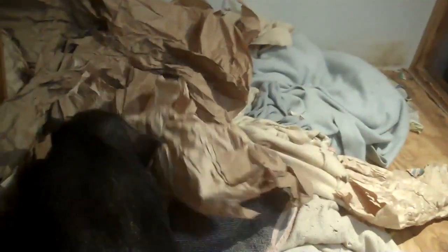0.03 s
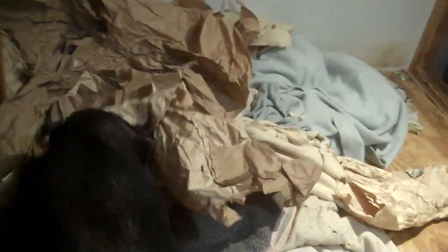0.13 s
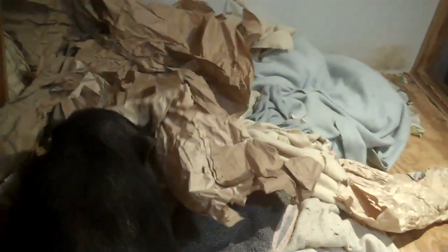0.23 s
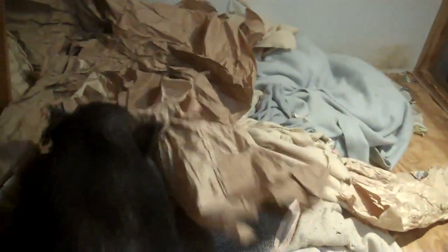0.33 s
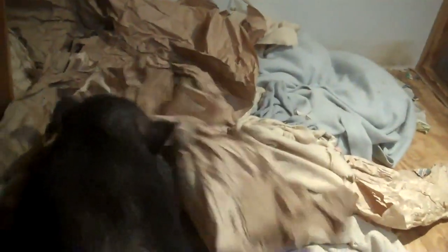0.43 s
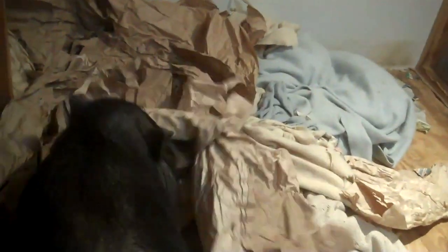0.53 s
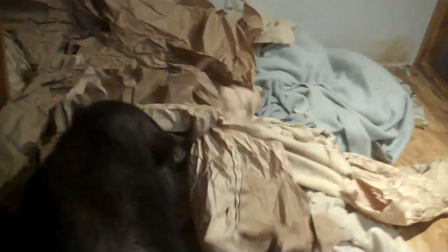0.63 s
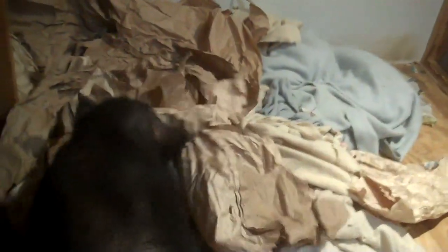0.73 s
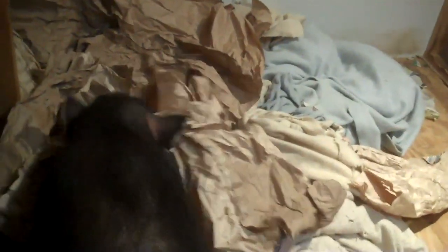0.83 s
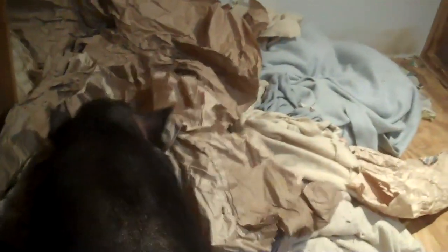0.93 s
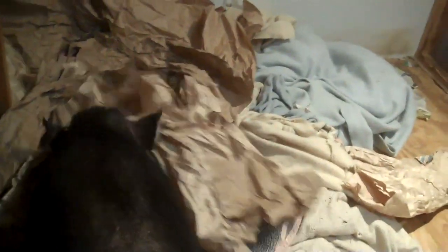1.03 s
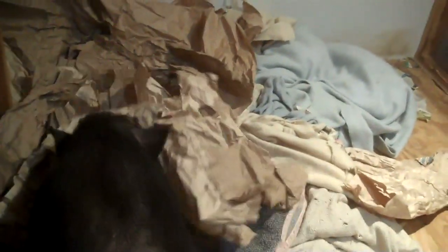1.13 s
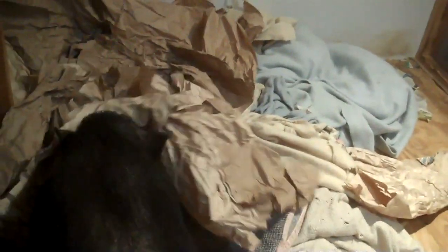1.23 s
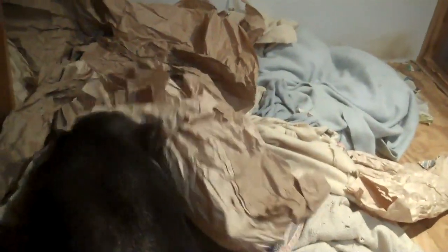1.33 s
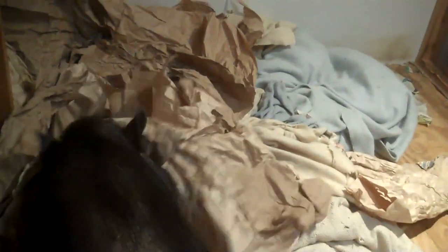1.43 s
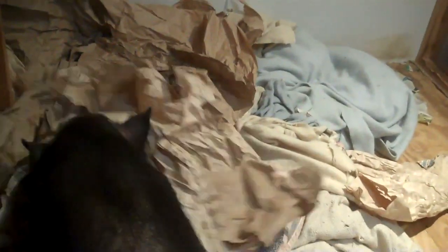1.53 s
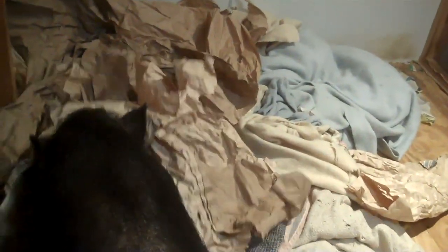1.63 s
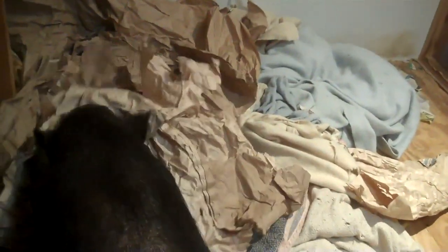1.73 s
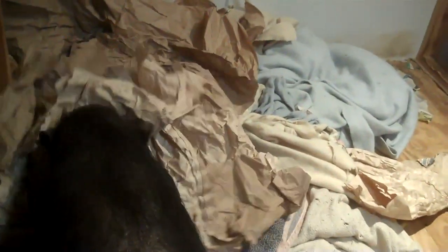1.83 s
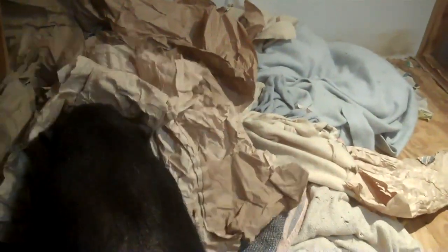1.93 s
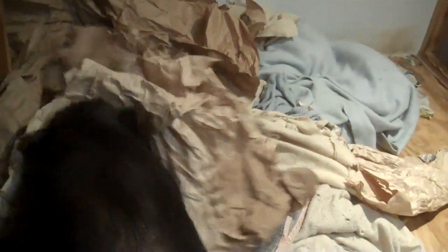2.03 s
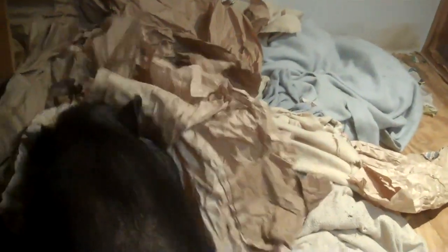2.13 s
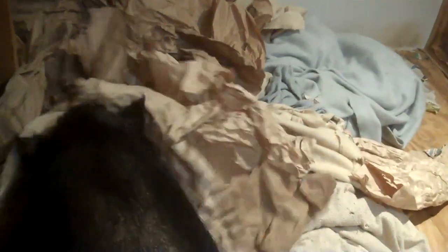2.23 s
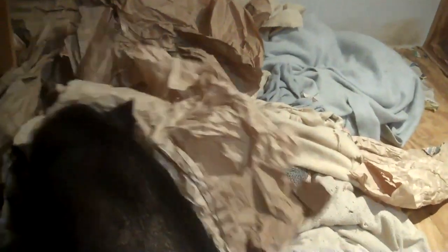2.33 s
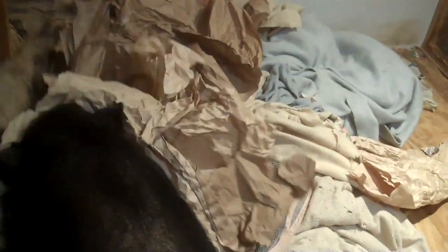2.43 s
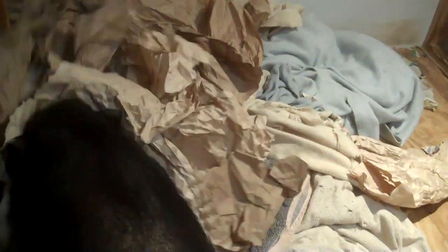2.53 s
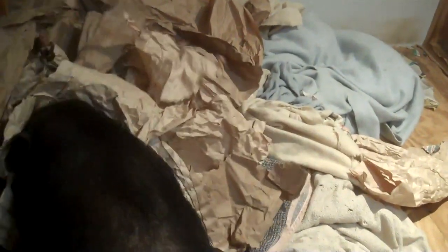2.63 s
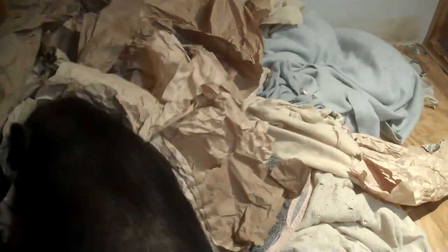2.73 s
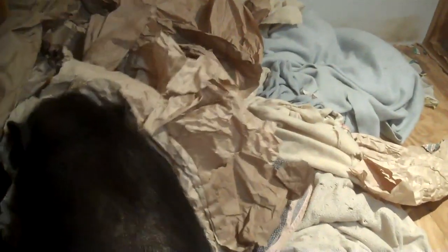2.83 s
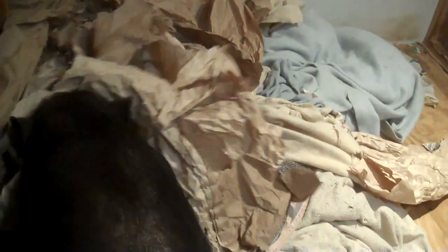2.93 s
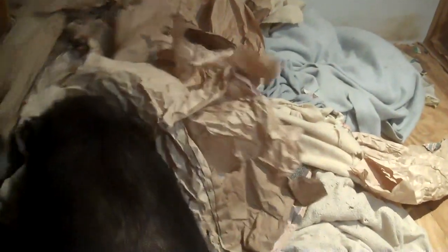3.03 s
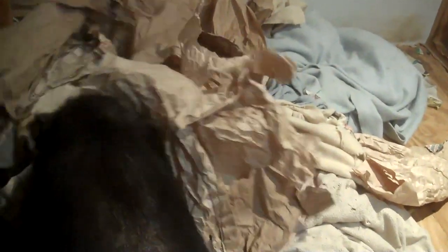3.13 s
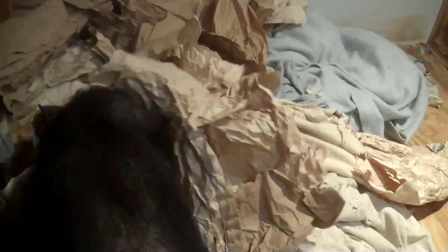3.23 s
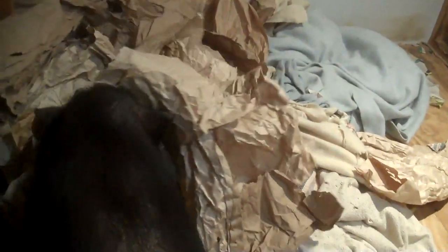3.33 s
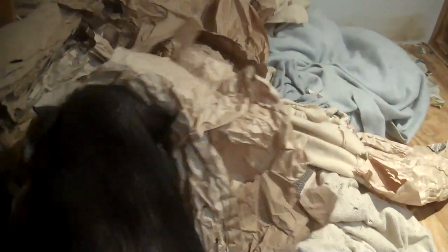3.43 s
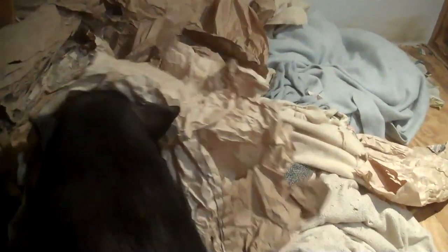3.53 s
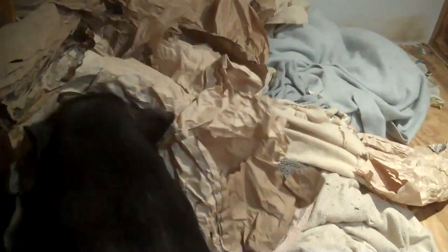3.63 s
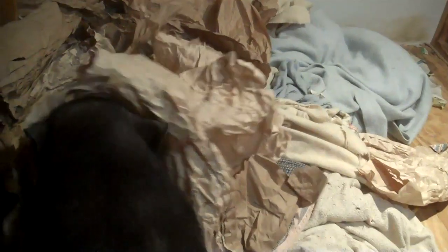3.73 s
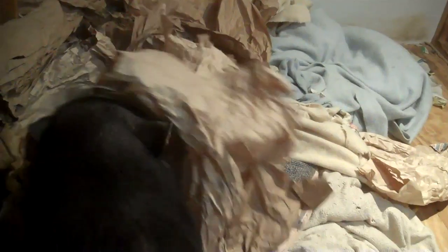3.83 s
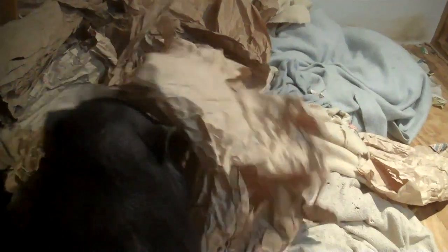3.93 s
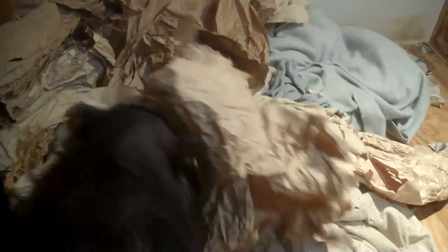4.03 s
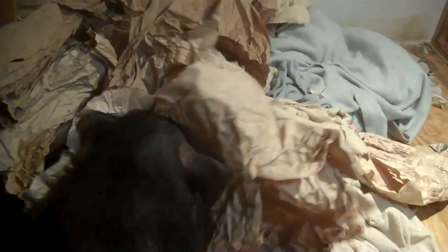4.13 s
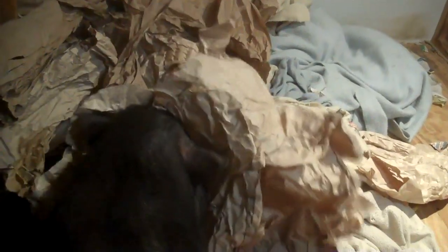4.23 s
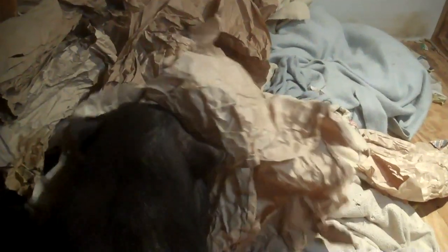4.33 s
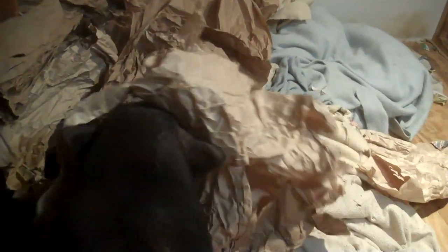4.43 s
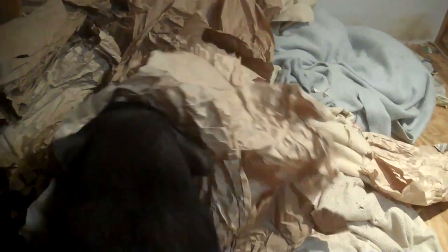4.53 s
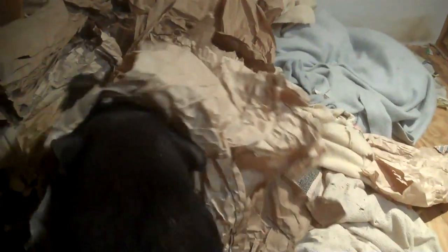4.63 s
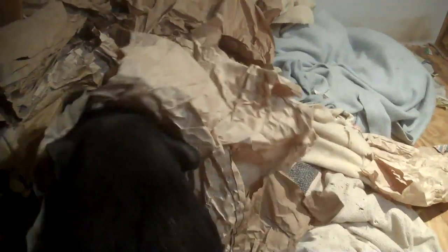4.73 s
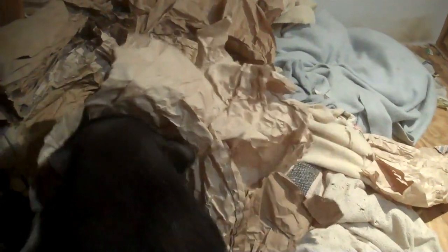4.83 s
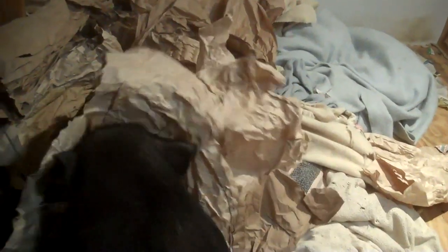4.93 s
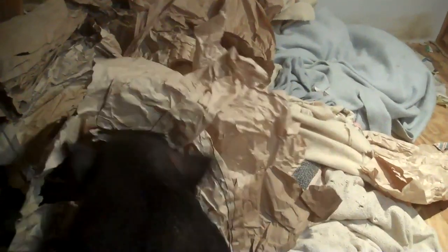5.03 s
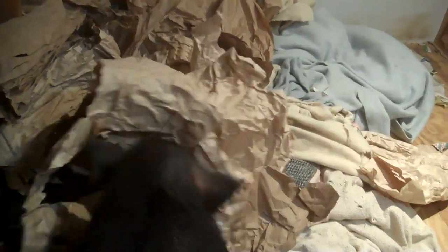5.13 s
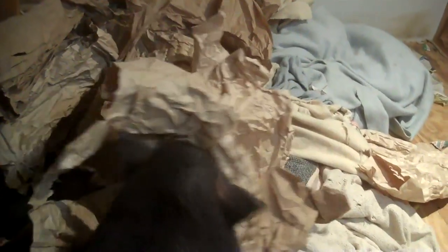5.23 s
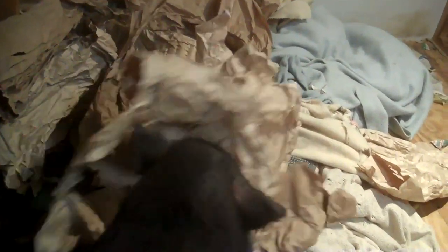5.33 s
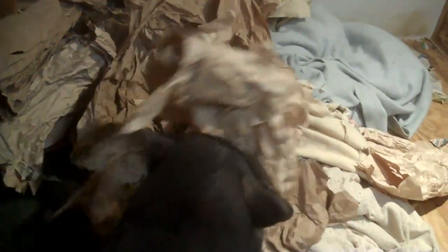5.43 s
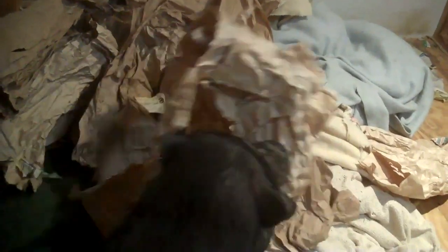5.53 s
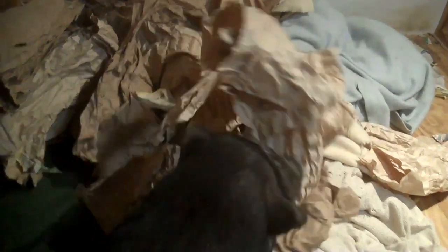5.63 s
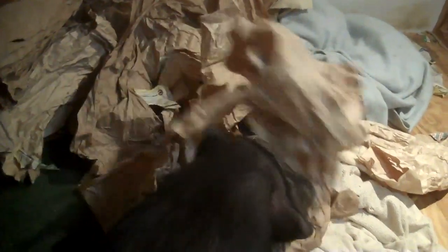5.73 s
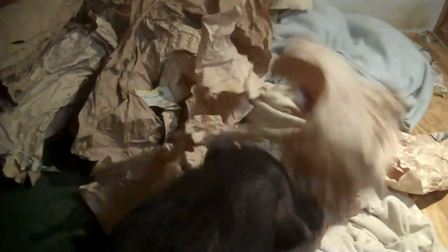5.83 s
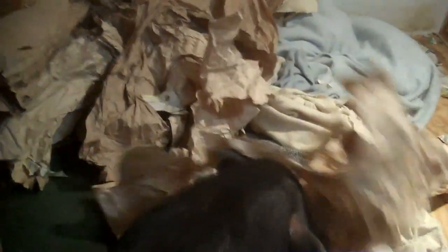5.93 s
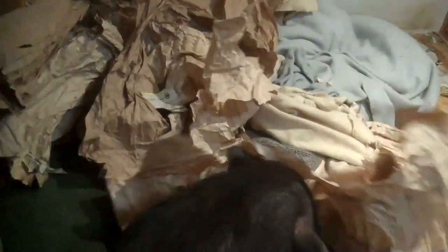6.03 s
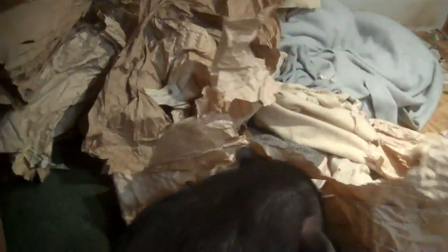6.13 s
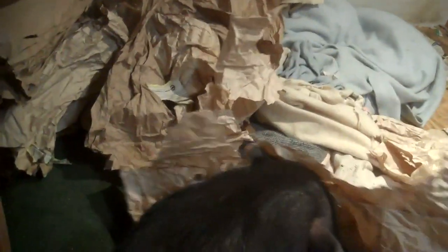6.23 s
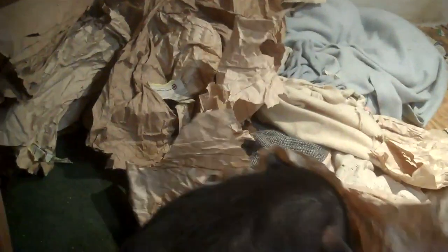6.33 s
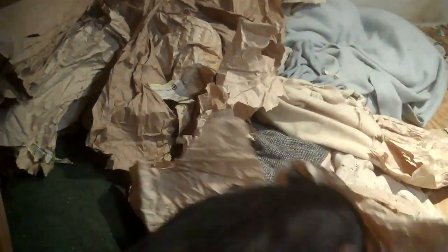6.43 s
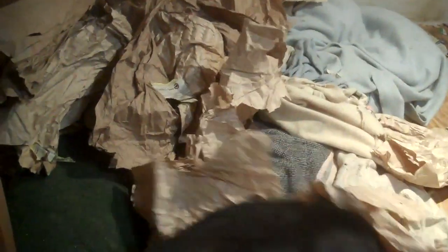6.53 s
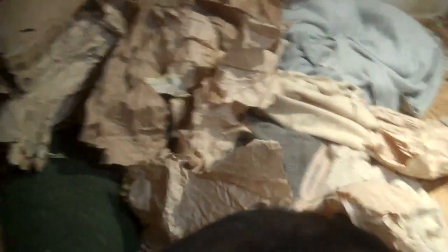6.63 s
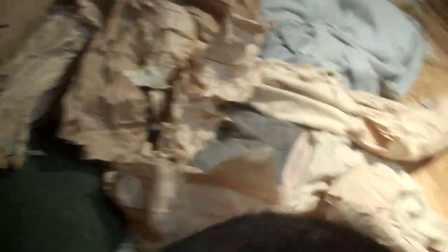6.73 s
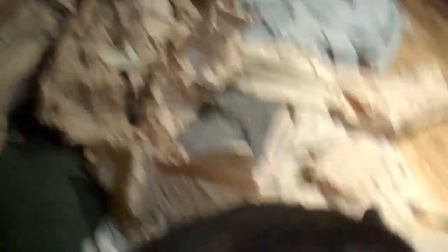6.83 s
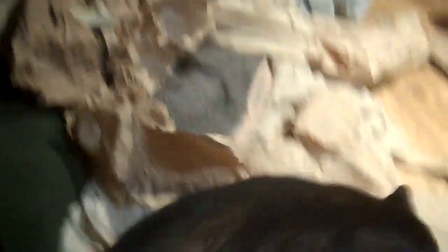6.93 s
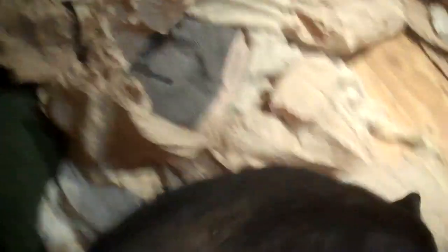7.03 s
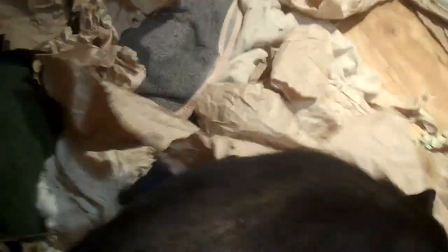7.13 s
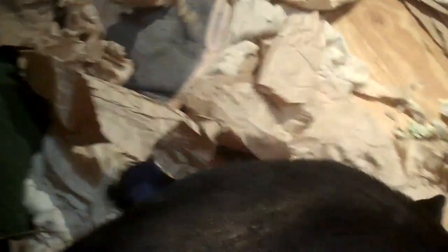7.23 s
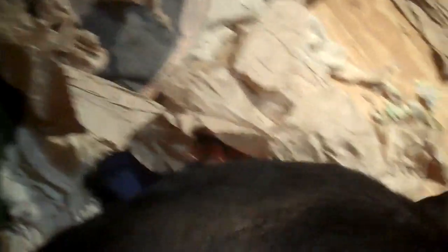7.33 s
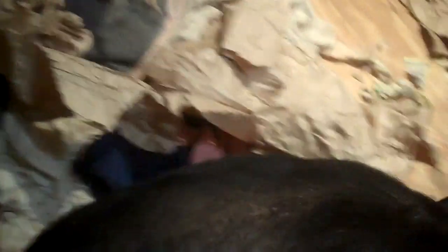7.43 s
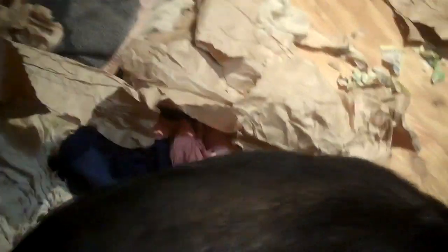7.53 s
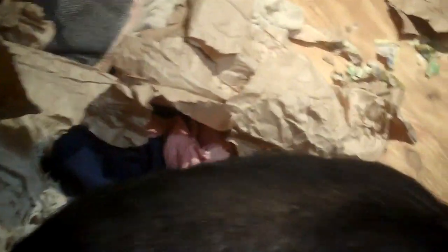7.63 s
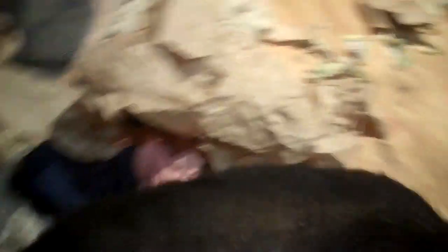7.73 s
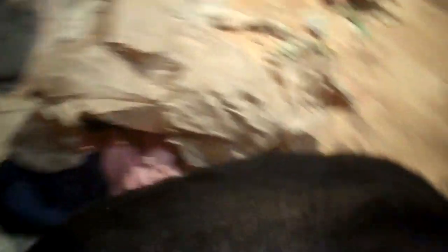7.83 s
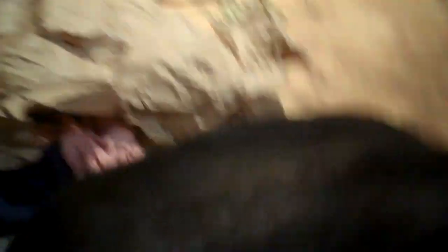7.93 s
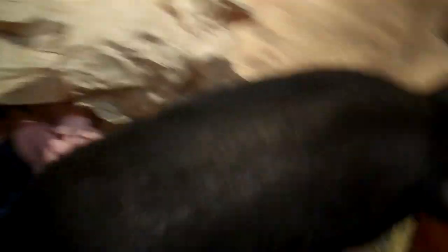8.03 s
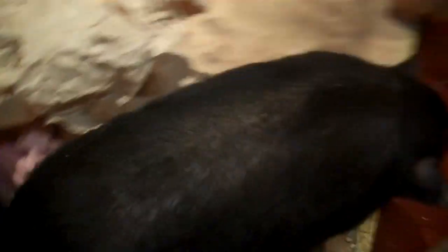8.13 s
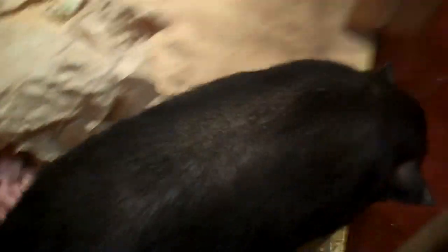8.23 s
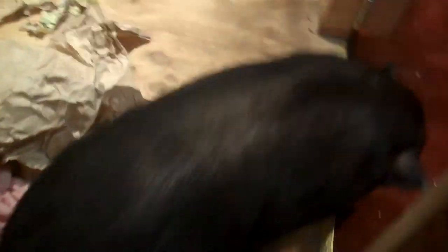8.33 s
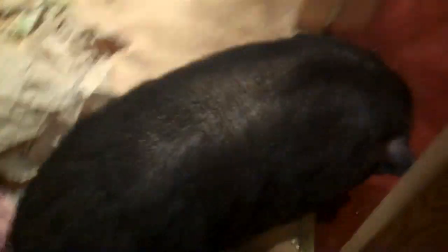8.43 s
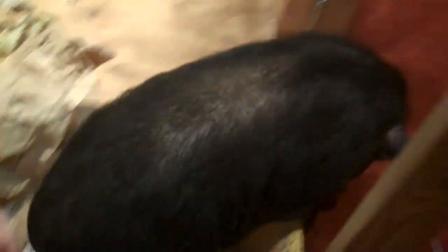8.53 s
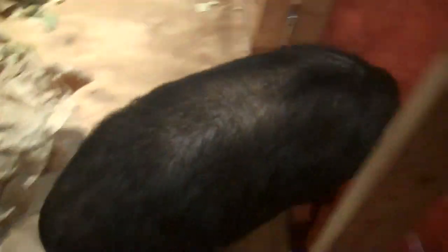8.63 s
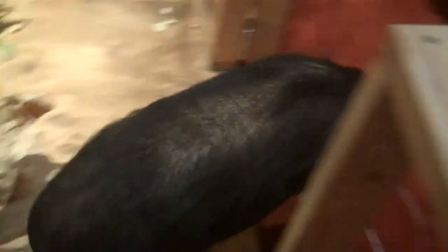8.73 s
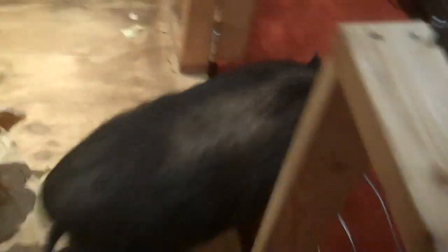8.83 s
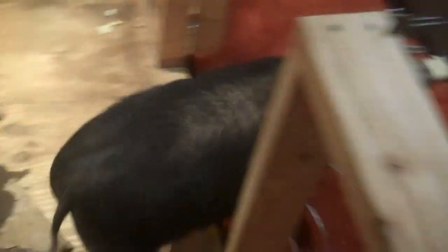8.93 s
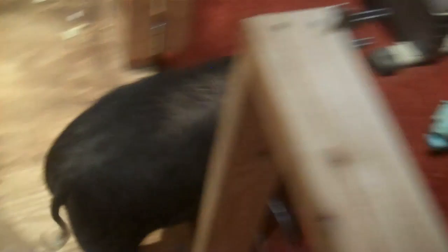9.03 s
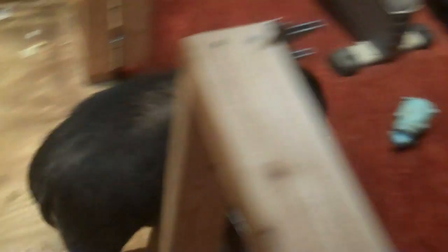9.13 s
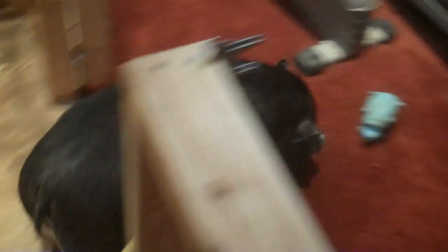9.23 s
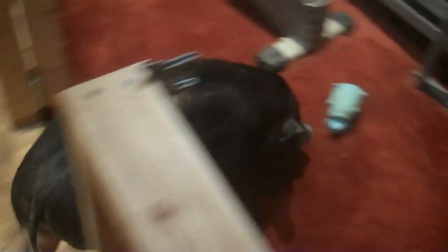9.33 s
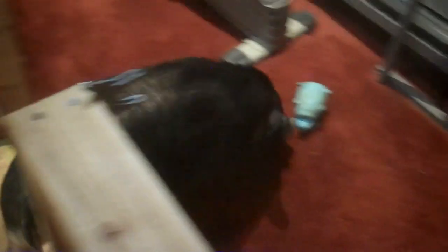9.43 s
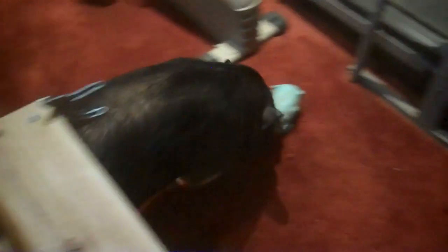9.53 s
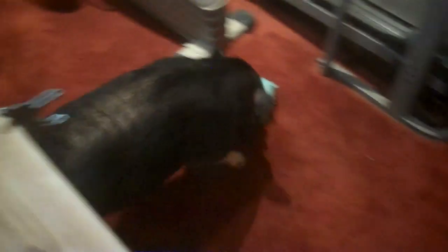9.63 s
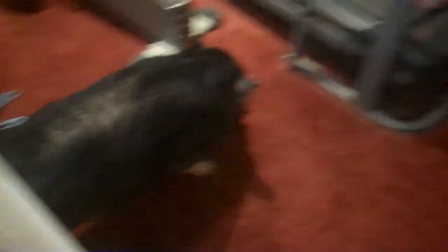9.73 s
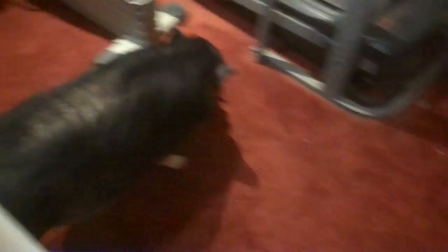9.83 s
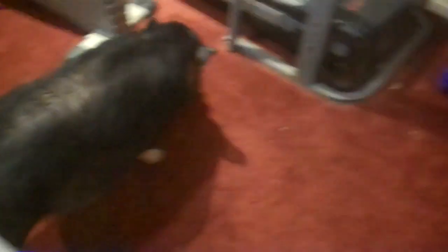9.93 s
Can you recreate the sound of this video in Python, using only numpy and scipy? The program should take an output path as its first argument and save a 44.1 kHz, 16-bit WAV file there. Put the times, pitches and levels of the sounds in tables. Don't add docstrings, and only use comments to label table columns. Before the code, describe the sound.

From the start, stiff packing paper crackles densely and very close as a pig shoves its snout through the heap. Until about 3.4 seconds the shoves overlap, loud and bright, with sharp snaps, crinkles, hollow panel pops and soft body rumble. From 3.5 to 7.1 seconds the nudges are lighter and more uneven, with snaps clustering near 4.1 and single cracks around 5.3, 6.2 and 6.6. At 7.4 a hoof clacks hard on a loose board, another follows at 7.8, and scraps tick and rustle between. A skid sounds near 8.4, a paper snap at 8.6 and a clack at 8.75; around 9.0 to 9.2 a wooden frame rattles with final hard clacks. Faint, dull carpet steps and tiny rustles fade until nearly 10 seconds. The small room gives short reflections; light hiss, a very faint high whine and handling rumble remain beneath.

```python
import sys
import numpy as np
from scipy import signal
from scipy.io import wavfile

SR = 44100
rng = np.random.default_rng(int(sys.argv[2]) if len(sys.argv) > 2 else 0)


def generate_wav(sig):
    pcm = np.round(np.clip(np.atleast_2d(sig).T, -1, 1) * 32767).astype(np.int16)
    wavfile.write(sys.argv[1], SR, pcm)


def gain_from_db(level_db):
    decades = np.asarray(level_db, float) / 20
    return 10 ** decades


N = 440118

# weight, rumble, rustle, crackle [Hz]
PUSH_HZ = [130, 480, 1900, 5500]
# (frequency [Hz], density [dB per Hz])
PAPER = [(40, -44), (90, -48), (170, -5), (380, 5), (640, 0.5), (900, 9), (2000, 7), (3500, 5.5), (7000, 1),
         (10000, -1), (14000, 5)]
# (middle [s], length [s], crackle [dB], heft [dB])
DIGS = [(0.149, 0.31, -20, -10.5), (0.267, 0.16, -24.5, -4.5), (0.441, 0.27, -23, -8.5),
        (0.545, 0.12, -25, -29), (0.661, 0.22, -22.0, -8), (0.836, 0.19, -24.5, -8.5),
        (0.915, 0.11, -23.5, -10), (0.977, 0.16, -27.5, -6), (1.219, 0.4, -22, -8),
        (1.303, 0.089, -17, -17), (1.464, 0.14, -26, -15), (1.629, 0.45, -25.5, -7.5),
        (1.859, 0.4, -21, -6.5), (1.981, 0.19, -24.5, -8.5), (2.131, 0.13, -23.5, -11.5),
        (2.219, 0.2, -28.5, -6), (2.347, 0.29, -23, -28), (2.396, 0.17, -23.5, -5.5),
        (2.611, 0.45, -24.5, -4), (2.619, 0.31, -22.5, -23), (2.861, 0.27, -30, -9), (3.054, 0.26, -26, -7),
        (3.245, 0.38, -29, -7.5), (3.411, 0.16, -33, -12.5)]
# (middle [s], length [s], crackle [dB], heft [dB])
NUDGES = [(1.345, 0.053, -29, -22), (3.564, 0.19, -30.5, -13), (3.734, 0.54, -32, -9.5),
          (3.836, 0.17, -33, -26), (4.093, 0.42, -28, -14.5), (4.358, 0.16, -31.5, -21),
          (4.473, 0.081, -36.5, -6), (4.626, 0.37, -28.5, -20), (4.95, 0.67, -33, -13),
          (5.021, 0.12, -28.5, -20), (5.314, 0.31, -34.5, -10.5), (5.516, 0.33, -35, -8),
          (5.745, .085, -38, -5.5), (5.977, 0.74, -31, -11.5), (6.032, 0.17, -28, -13),
          (6.1, .129, -35.3, -25), (6.273, 0.15, -28, -10.5), (6.468, .074, -32.5, -18),
          (6.55, .988, -33, -12.5), (6.656, 0.18, -31, -13), (6.84, 0.28, -28, -12.5),
          (7.02, 0.1, -30, -11.5), (7.11, 0.2, -29, -16)]
# (middle [s], length [s], crackle [dB], heft [dB])
SCUFFS = [(7.39, 0.32, -38.5, -12.5), (7.62, 0.6, -46, -8), (7.86, 0.057, -43, -9), (7.96, 0.56, -49, -5.5),
          (7.235, 0.11, -41, -10.5), (8.205, 0.1, -29.5, -13.5), (8.31, 0.29, -42, -11),
          (8.645, 0.13, -35, -9), (8.57, 0.091, -40, -15), (8.9, 0.94, -56.5, -0.5), (9.0, 0.047, -56, 1),
          (9.1, .07, -58, 13), (9.3, 0.14, -41.5, -10.5), (9.42, 0.18, -54.5, 2), (9.51, 0.049, -46, -25),
          (9.62, 0.22, -61, 4.5), (9.77, 0.26, -57, -1.5)]
# (start [s], length [s], crackle [dB], heft [dB])
JOLTS = [(.048, 0.054, -24.5, -13), (7.275, 0.07, -35.5, -4.5), (7.775, .12, -52, 0),
         (8.018, 0.038, -40, -15), (8.152, 0.061, -38.5, -8), (8.372, 0.18, -39, -7),
         (8.497, 0.043, -34.5, -15), (8.603, 0.05, -31.5, -25), (8.753, 0.066, -44, 4.5),
         (9.028, 0.062, -44, 1), (9.14, 0.042, -38.5, -1.5), (9.185, 0.062, -34, -1)]
# (middle [s], length [s], level [dB])
THUMPS = [(0.846, 0.13, -64), (1.827, 0.23, -39), (2.85, 0.16, -56), (4.25, 0.09, -55), (5.18, 0.18, -53),
          (6.753, 0.26, -42), (7.454, 0.064, -50), (7.79, .08, -50), (8.4, 0.074, -45), (8.598, 0.1, -38),
          (8.65, 0.055, -37), (8.836, 0.13, -54.5), (9.01, 0.16, -50), (9.712, 0.091, -49),
          (9.827, 0.051, -46)]
# (time [s], peak [dB], facet [Hz], bright click [dB])
SNAPS = [(0.244, 0.5, 2040, -7), (0.272, -4, 4530, -2), (0.309, -8, 2200, 0), (0.401, -4, 2210, -8),
         (0.612, 0, 1960, -16), (0.655, -6, 2070, -3), (0.796, -9, 1980, -21), (1.29, -8, 1910, -1.5),
         (1.392, -13, 4050, -5), (1.426, -7, 3450, -3), (1.488, -4.5, 3700, -5), (2.403, -16.5, 2740, 8.5),
         (2.985, -11, 4430, -15), (3.511, -15, 4000, -8), (4.095, -5.5, 3960, -7), (4.131, -5, 3060, -3),
         (4.152, -6.5, 4040, -3.5), (4.372, -17, 2060, -2), (4.57, -8, 1890, -21), (4.676, -14, 4320, -8),
         (4.98, -16, 4010, -3), (5.3, -11.5, 3700, -11), (5.372, -15, 3860, -20), (5.468, -12, 2540, -7),
         (5.958, -15.5, 4260, -3), (6.234, -6.5, 2500, 0), (6.635, -4.5, 2000, -10.5),
         (6.784, -13, 4300, -12), (6.898, -10, 3580, -15), (7.007, -9.5, 4460, -4), (8.625, -9, 2700, -22)]
# (time [s], peak [dB], facet [Hz], bright click [dB])
TICKS = [(0.0458, -3, 2360, -8), (0.3561, -5, 2220, -12), (0.4224, -8, 3110, -11), (1.1294, -20, 1960, -8),
         (1.5644, -16, 5000, -8), (1.6894, -15, 3200, -10), (1.8734, -2, 3490, -8), (1.8864, -5, 1860, -8),
         (2.0824, -19, 2340, -10), (2.1074, -15, 1520, -11), (2.2454, -14, 1850, -14),
         (2.287, -20, 4290, -8), (2.8634, -17, 1880, -11), (3.2034, -12, 3770, -8), (3.7978, -13, 3570, -8),
         (3.8294, -17, 4810, -8), (3.9834, -22, 2490, -10), (4.3191, -14, 3030, -10),
         (4.4774, -19, 2520, -8), (4.8559, -16, 2600, -11), (5.1804, -24, 2370, -8),
         (5.5782, -21, 3870, -8), (6.043, -12, 3350, -8), (6.2064, -19, 4430, -8), (6.3784, -21, 3710, -6),
         (6.4434, -21, 5000, -11), (6.5274, -21, 3040, -8), (6.621, -13, 2030, -1), (6.8544, -14, 4930, -1),
         (6.951, -17.5, 4840, -8), (7.0554, -19, 1520, -8), (7.3522, -21, 1360, -4),
         (7.3721, -19, 1920, -8), (7.4001, -25, 1990, -8), (7.7154, -28, 2010, -8), (8.1154, -36, 2130, -8),
         (8.5394, -39, 4850, -11), (8.5604, -27, 4680, -8), (8.588, -13, 4080, -5), (8.6, -14.5, 2640, -14),
         (8.659, -19, 2040, -7), (9.2814, -20, 3460, -11)]
# (time [s], peak [dB], facet [Hz])
CRINKLES = [(.094, -9, 1730), (0.137, -5.5, 2720), (0.209, -7.5, 2410), (.222, -8.5, 2380),
            (.235, -9, 2300), (0.686, -12, 2980), (0.974, -10, 1580), (1.072, -10.5, 770),
            (1.235, -8.5, 960), (1.605, -10, 2230), (1.856, -13, 2570), (2.495, -14, 3320),
            (2.719, -17, 1410), (3.728, -16, 1970), (3.76, -18, 3650), (4.189, -15.5, 2540),
            (4.268, -33, 400), (4.461, -21, 2770), (4.808, -21, 2630), (5.376, -21.5, 930),
            (5.405, -18.5, 920), (5.499, -20, 1640), (5.703, -20, 1480), (5.818, -16.5, 1450),
            (5.929, -29, 1810), (6.059, -22, 1410), (6.18, -19, 2160), (6.283, -10, 1750),
            (6.592, -16.5, 2630), (6.659, -18, 920), (6.735, -13, 2470), (6.976, -20, 1400),
            (0.018, -24, 1390), (0.121, -16, 1370), (0.302, -18, 1360), (0.397, -18, 797), (0.617, -21, 982),
        (0.795, -22, 1400), (0.972, -22, 1370), (1.072, -20, 775), (1.143, -19, 538), (1.234, -16, 926),
        (1.424, -30, 789), (1.462, -30, 1090), (1.546, -25, 1020), (1.697, -23, 950), (1.75, -12, 980),
        (2.087, -20, 945), (2.271, -26, 950), (2.313, -26, 972), (2.369, -16, 947), (2.445, -17, 794),
        (2.661, -16, 956), (2.719, -20, 1140), (3.137, -27, 1400), (3.214, -22, 1380), (3.543, -24, 999),
        (3.624, -31, 1250), (3.718, -25, 458), (4.442, -36.5, 1140), (4.808, -28, 1240), (5.404, -28, 396),
        (5.703, -31, 907), (5.802, -29, 837), (5.929, -29, 985), (6.038, -28, 756), (6.23, -29.5, 1010),
        (6.284, -22, 1380), (6.596, -33, 810), (6.632, -24, 907), (6.782, -29, 1130), (6.9, -28, 1230)]
# (frequency [Hz], t60 [s])
ROOM = [(150, 0.52), (1000, 0.29), (7000, 0.15), (14000, 0.59)]
# (centre [Hz], width [Hz], share removed [0-1])
FLOOR_DIPS = [(293, 57, 0.34), (675, 135, 0.39), (1200, 410, 0.4)]
# (frequency [Hz], density [dB per Hz])
HUSH = [(40, -44), (150, 2), (500, 3), (1500, -6.5), (4000, -12), (8000, -18), (14000, -21)]
# (time [s], peak [dB], centre [Hz], thud [dB], t60 [s])
HOOVES = [
    (7.4265, -1.5, 1300, -16.5, 0.1),
    (7.772, -9, 1980, -11.5, 0.14),
    (7.947, -34, 2160, -6, .029),
    (8.750, -9, 2000, -26, 0.13),
    (8.921, -35, 1380, -5, 0.052),
    (9.138, -12.5, 2740, -32, 0.03),
    (9.182, -6.5, 2290, -44, 0.068),
]
# (time [s], peak [dB], centre [Hz], thud [dB], t60 [s])
SKIDS = [
    (8.361, -10, 1420, -25.5, 0.17),
    (8.585, -33, 260, -30, .06),
    (8.602, -31.5, 300, -30, 0.053),
    (8.645, -20, 1600, -14, .07),
    (9.022, -18, 1850, -20, 0.09),
    (9.426, -36, 600, -8, .1),
    (9.69, -41, 500, -10, .1),
    (9.745, -41, 600, -10, .1),
    (9.8, -41, 450, -10, .1),
]
# (time [s], peak [dB], centre [Hz], tick [dB])
SCRAPS = [(7.272, -11.5, 2850, -7), (7.471, -20, 3500, -3), (7.572, -12.5, 2700, -11.5),
          (7.624, -20, 2800, -3.5), (7.655, -13.5, 2420, -13), (7.857, -25, 1590, -16),
          (8.016, -28, 3900, -27), (8.084, -23, 2800, -21), (8.148, -30, 3390, 2), (8.19, -16, 4530, -20),
          (8.493, -16, 2870, -15), (8.608, -26, 2700, 10), (9.159, -18, 2640, -23), (9.5, -41, 3500, 7),
          (9.596, -38, 3700, -14), (9.734, -44, 2770, 4)]
# (mode [Hz], level [dB], t60 [s])
FRAME = [(447, -10.5, 0.18), (804, -14, 0.16), (1290, -8, .16), (1345, -10, .2), (1460, -11, 0.098),
         (1785, -8, .16), (1845, -12, .2), (2000, -8, .12), (2293, -12, .1), (2550, -12, .07),
         (3390, -3, .04), (3300, -18, 0.23), (3380, -16, .3), (4130, -7, .04)]
# (mode [Hz], level [dB], t60 [s])
BOARD = [(330, -14, .03), (800, -3.5, 0.021), (1050, -2, 0.016), (1470, -6, 0.014), (1760, -9, .014),
         (2105, -5, .015), (2600, -8, .012), (3300, -11, .012)]
# (resonance [Hz], sharpness [Q])
PORTS = [(7364, 5.86), (6040, 5.2)]
# (middle [s], length [s], level [dB])
JOGS = [
    (.85, .2, -66),
    (1.83, 0.36, -62),
    (2.87, .2, -63),
    (3.8, .2, -69),
    (7.8, .15, -66),
    (8.4, .15, -66),
    (8.6, .2, -62),
    (8.82, .15, -62),
    (9.05, .2, -65),
    (9.7, .3, -71),
]
EDGES_HZ = 60 * 2 ** np.arange(0, 8.1, .5)

RISE_SHARE, SCUFF_RISE_SHARE, JOLT_RISE_SHARE = 0.49, 0.52, 0.11
LENGTH_SHARE, LEAD_S = 0.91, 0.0057
REST_DB, REST_HEFT_DB = -66, -9
RUSTLE_HEFT, RUSTLE_DB, RUMBLE_DB = 0.58, 3.0, -0.5
WEIGHT_SWING, WEIGHT_DB, WEIGHT_SWAY_DB = 1.02, -20.5, 4.5
AFTER_S, AFTER_DB, AFTER_HEFT_DB = 0.02, -25, -13
FAR_S, FAR_HZ, FAR_DB = (8.65, 9.9), 8500, -13
HOOF_TICK_DB, SCRAP_THUD_DB, SCRAP_T60_S = -19, -35, 0.031
CLACK_RISE_S, SKID_RISE_S = .0007, .005
KNOCK_S, KNOCK_DB, BOARD_S, BOARD_DB = 9.024, -29, 7.428, -23.5
HUSH_DB, HISS_DB, HANDLING_DB = -57.5, -62, -75.5
WHINE_HZ, WHINE_DB = 11800, -82
RIGHT_TOP_HZ, BASS_CUT_HZ, CUTOFF_HZ = 10200, 104, 14750


def rms_one(x):
    return x / np.sqrt(np.mean(x ** 2) + 1e-20)


def at_hz(points, hz):
    points = np.array(points)
    return np.interp(np.log(hz), np.log(points[:, 0]), points[:, 1])


def band(x, low_hz, high_hz):
    edges_hz = [low_hz, min(high_hz, .45 * SR)]
    return signal.sosfilt(signal.butter(2, edges_hz, "band", fs=SR, output="sos"), x)


def high_pass(x, order, hz):
    return signal.sosfilt(signal.butter(order, hz, "high", fs=SR, output="sos"), x)


def drift(rate_hz):
    r = np.exp(-80 * np.pi * rate_hz / SR)
    noise = rng.standard_normal(N // 40 + 2002)
    slow = signal.lfilter([1], [1, -2 * r, r * r], noise)[2000:]
    return np.interp(np.arange(N) / 40, np.arange(len(slow)), rms_one(slow))


def bell(late_s, length_s, db, rise):
    side_s = length_s * np.where(late_s < 0, rise, 1 - rise)
    return gain_from_db(2 * db - 20 * (late_s / side_s) ** 2)


def ring(clicks, hz, t60_s):
    r, w = gain_from_db(-60 / (t60_s * SR)), 2 * np.pi * hz / SR
    return signal.lfilter([0, np.sin(w)], [1, -2 * r * np.cos(w), r * r], clicks + 1e-18)


def add(out, burst, s, db):
    at = round(s * SR)
    out[at:at + len(burst)] += gain_from_db(db) * (burst / np.abs(burst).max())[:N - at]


def effort():
    s = np.arange(0, N / SR + .01, .002)
    crackle, heft = gain_from_db(2 * REST_DB), gain_from_db(2 * (REST_DB + REST_HEFT_DB))
    after = [(at + 0.0029, AFTER_S, db + AFTER_DB, AFTER_HEFT_DB) for at, db, *_ in SNAPS + TICKS]
    groups = ((DIGS + NUDGES, RISE_SHARE, LEAD_S),
              (SCUFFS, SCUFF_RISE_SHARE, LEAD_S),
              (JOLTS + after, JOLT_RISE_SHARE, 0))
    for rows, rise, lead_s in groups:
        for middle_s, length_s, db, heft_db in rows:
            power = bell(s - middle_s + lead_s, LENGTH_SHARE * length_s, db, rise)
            crackle = crackle + power
            heft = heft + power * gain_from_db(2 * heft_db)
    crackle_db, heft_db = 10 * np.log10(crackle), 10 * np.log10(heft)
    rustle_db = crackle_db + RUSTLE_HEFT * (heft_db - crackle_db) + RUSTLE_DB
    sway = np.interp(s, np.arange(N) / SR, drift(14.0))
    weight = gain_from_db(2 * (WEIGHT_SWING * heft_db + WEIGHT_DB + WEIGHT_SWAY_DB * sway))
    for middle_s, length_s, db in THUMPS:
        weight = weight + bell(s - middle_s, length_s, db, SCUFF_RISE_SHARE)
    return s, crackle_db + 3.0, rustle_db, heft_db + RUMBLE_DB, 10 * np.log10(weight)


def creases(per_s, spread_db, clump_db):
    sizes = gain_from_db(spread_db * np.minimum(rng.exponential(1, N), 5)) * rng.choice([-1, 1], N)
    born = rng.random(N) < per_s * gain_from_db(clump_db * drift(25)) / SR
    return rms_one(sizes * born)


def at_ports(per_s, spread_db, clump_db):
    draws = [creases(per_s, spread_db, clump_db) for place in range(3)]
    return np.array([sum(draws), sum(np.roll(d, k - 1) for k, d in enumerate(draws))])


def paper():
    s, crackle_db, rustle_db, rumble_db, weight_db = effort()
    crackle_db = crackle_db - 10.5
    rustle_db = np.maximum(rustle_db - 3, crackle_db - 2)
    layers_db = np.array([weight_db + 19, rumble_db + 5, rustle_db, crackle_db])
    wide = at_ports(500, spread_db=5.0, clump_db=7.0)
    small = [at_ports(900, spread_db=2.0, clump_db=5.0) for draw in range(2)]
    flips = creases(15, spread_db=2.5, clump_db=2.5)
    out, time = np.zeros((2, N)), np.arange(N) / SR
    for k, (low, high) in enumerate(zip(EDGES_HZ, EDGES_HZ[1:])):
        hz = np.sqrt(low * high)
        shares = np.array([np.interp(np.log(hz), np.log(PUSH_HZ), only) for only in np.eye(4)])
        gain_db = np.interp(time, s, shares @ layers_db) + at_hz(PAPER, hz) - 1.5
        gain_db += 1.01 * drift(12.0) + 0.84 * drift(43.0)
        if hz > FAR_HZ:
            gain_db += np.interp(time, FAR_S, [0, FAR_DB])
        grains = band(0.49 * wide + 0.87 * np.roll(small[k % 2], 997 * k, axis=1), low, high)
        facets = np.zeros(N)
        for shift, pitch in rng.random((5, 2)):
            facet_hz = low * (high / low) ** pitch
            facets += rms_one(ring(np.roll(flips, int(shift * N)), facet_hz, 14 / hz))
        out += gain_from_db(gain_db) * (grains + 0.23 * np.sqrt((high - low) / SR) * facets)
    return out


def snaps():
    out, time = np.zeros(N), np.arange(round(.02 * SR)) / SR
    for s, db, hz, click_db in SNAPS + TICKS:
        tear = rng.standard_normal(len(time)) * np.minimum(time / 0.0011, 1) ** 2
        add(out, band(tear * gain_from_db(-60 * time / 0.009), 4260, 8800), s, db + click_db - 5.0)
        add(out, band(tear * gain_from_db(-60 * time / 0.04), hz / 1.12, hz * 1.22), s, db - 16.0)
    for s, db, hz in CRINKLES:
        fold = rng.standard_normal(len(time)) * np.hanning(len(time)) * gain_from_db(-60 * time / 0.03)
        add(out, band(fold, hz / 1.59, hz * 1.35), s - .002, db - 6.5)
    return out


def room(x):
    hop, time = 5000, np.arange(13000) / SR
    places, octaves_hz = N // hop + 2, EDGES_HZ[::2]
    noise = rng.standard_normal((2, places, len(time))) * (time > .004)
    mid, side = sum(band(noise, low, high) * gain_from_db(-60 * time / at_hz(ROOM, low))
                    for low, high in zip(octaves_hz, octaves_hz[1:]))
    side = 2.8 * high_pass(side, 1, 3000)
    echoes = np.array([mid + side, mid - side]) / np.sqrt(np.sum(mid ** 2) / places)
    padded, out = np.pad(x, (hop, 3 * hop)), np.zeros((2, N + 8 * hop))
    for k in range(places):
        piece = padded[k * hop:(k + 2) * hop] * np.hanning(2 * hop)
        heard = signal.fftconvolve(piece[None], echoes[:, k], axes=1)
        out[:, k * hop:k * hop + heard.shape[1]] += heard
    return out[:, hop:hop + N]


def floor_bounce(x):
    for hz, width_hz, share in FLOOR_DIPS:
        x = x - share * signal.lfilter(*signal.iirpeak(hz, hz / width_hz, fs=SR), x)
    return x


def hush():
    mid, side = rng.standard_normal((2, N))
    side = high_pass(side, 1, 2200)
    pair = np.array([mid + side, mid - side])
    tone = np.zeros((2, N))
    for k, (low, high) in enumerate(zip(EDGES_HZ, EDGES_HZ[1:])):
        tone += gain_from_db(at_hz(HUSH, low * 0.98)) * band(np.roll(pair, 997 * k, axis=1), low, high)
    return gain_from_db(HUSH_DB) * rms_one(tone)


def knock(modes, s, db, chatter_s):
    out, time = np.zeros(N), np.arange(round(.4 * SR)) / SR
    for hz, mode_db, t60_s in modes:
        chatter = rng.standard_normal(len(time)) * time * np.exp(-time / chatter_s)
        add(out, ring(chatter, hz, t60_s), s, db + mode_db)
    return out


def steps(rattle):
    out, time = np.zeros(N), np.arange(round(.15 * SR)) / SR
    blows = [(*row, HOOF_TICK_DB, CLACK_RISE_S) for row in HOOVES]
    blows += [(*row, HOOF_TICK_DB, SKID_RISE_S) for row in SKIDS]
    blows += [(s, db, hz, SCRAP_THUD_DB, SCRAP_T60_S, tick_db, CLACK_RISE_S) for s, db, hz, tick_db in SCRAPS]
    for s, db, hz, thud_db, t60_s, tick_db, rise_s in blows:
        noise = rng.standard_normal(len(time))
        blow = rattle * noise * gain_from_db(-60 * time / t60_s) * np.minimum(time / rise_s, 1)
        blow[round(rise_s * SR)] += 10.7 * CLACK_RISE_S / rise_s
        add(out, band(band(blow, hz / 1.82, hz * 1.71), 110, hz * 2), s, db - 6.5)
        add(out, band(blow, 180, 460), s + 0.00055, db + thud_db - 4.5)
        add(out, band(blow * gain_from_db(-60 * time / 0.11), 3440, 8300), s, db + tick_db + .3)
    out += knock(FRAME, KNOCK_S, KNOCK_DB, chatter_s=0.0038)
    return out + knock(BOARD, BOARD_S, BOARD_DB, chatter_s=0.019)


def scene():
    heap, cracks = paper(), snaps()
    wet = gain_from_db(-11.5) * heap.mean(axis=0) + gain_from_db(-9.0) * cracks + gain_from_db(-2.5) * steps(rattle=0.05)
    return floor_bounce(heap + cracks + room(wet)) + steps(rattle=1.0) + hush()


def ports(dry):
    out = []
    for x, (hz, sharpness) in zip(dry, PORTS):
        w = 2 * SR * np.tan(np.pi * hz / SR)
        out.append(signal.lfilter(*signal.bilinear([w * w], [1, w / sharpness, w * w], SR), x))
    top = signal.butter(2, RIGHT_TOP_HZ, fs=SR, output="sos")
    out[1] = gain_from_db(1.13) * signal.sosfiltfilt(top, out[1])
    return np.array(out)


def circuit_and_hand():
    hiss = rng.standard_normal((2, N))
    whine = rms_one(band(hiss, WHINE_HZ - 40, WHINE_HZ + 40))
    hand_power = gain_from_db(2 * HANDLING_DB + 6.6 * drift(1.9))
    for middle_s, length_s, db in JOGS:
        hand_power = hand_power + bell(np.arange(N) / SR - middle_s, length_s, db, .5)
    hand = rms_one(band(hiss, 37, 190)) * np.sqrt(hand_power)
    return gain_from_db(HISS_DB) * hiss + gain_from_db(WHINE_DB) * whine + hand


def roll_off(x):
    return signal.sosfilt(signal.butter(12, 14450, fs=SR, output="sos"), x)


def record(dry):
    out = high_pass(np.tanh(ports(dry)), 3, BASS_CUT_HZ) + circuit_and_hand()
    out = signal.sosfilt(signal.cheby2(12, 50, CUTOFF_HZ, fs=SR, output="sos"), out)
    return roll_off(out)


dry = scene()
out = record(dry)
generate_wav(out)
```